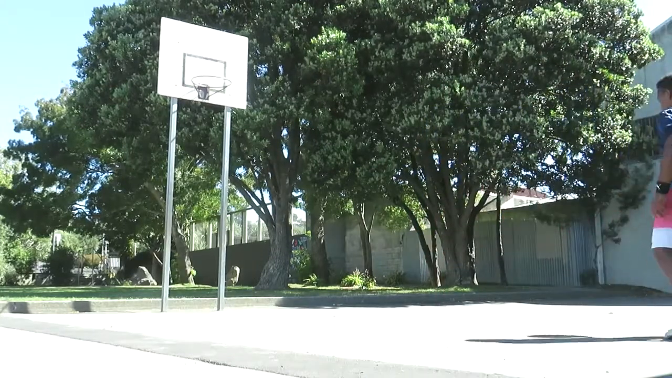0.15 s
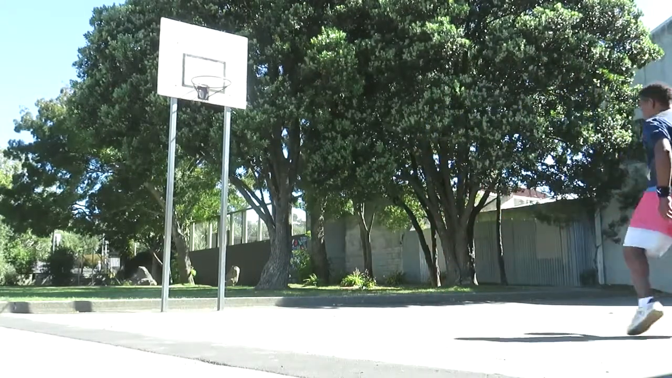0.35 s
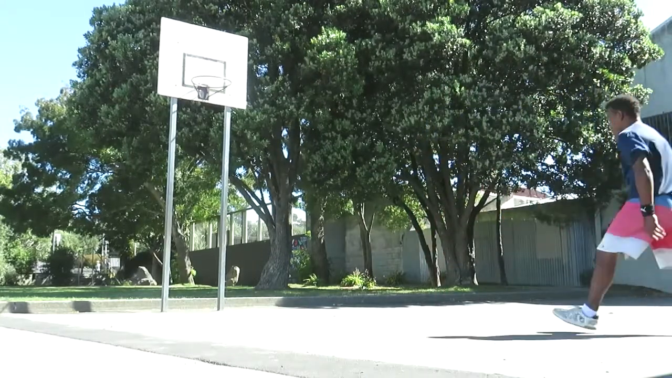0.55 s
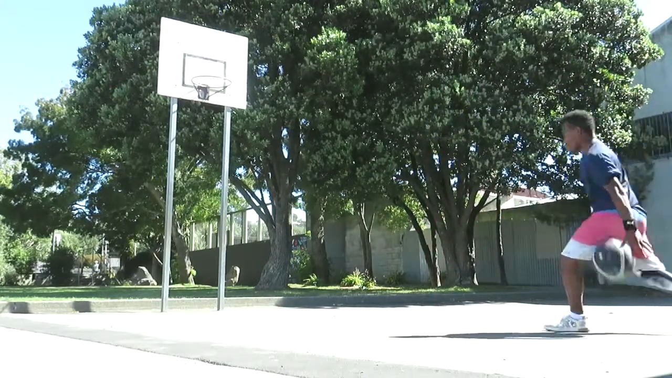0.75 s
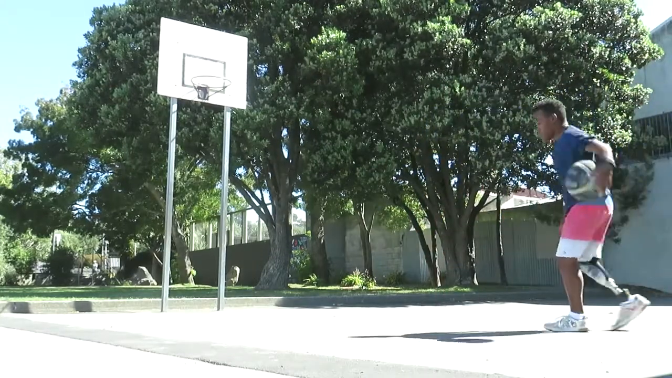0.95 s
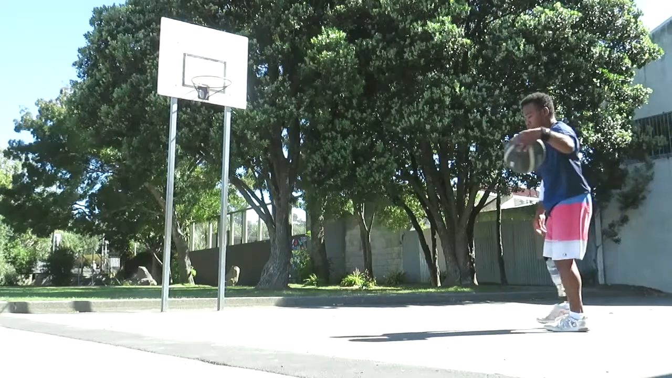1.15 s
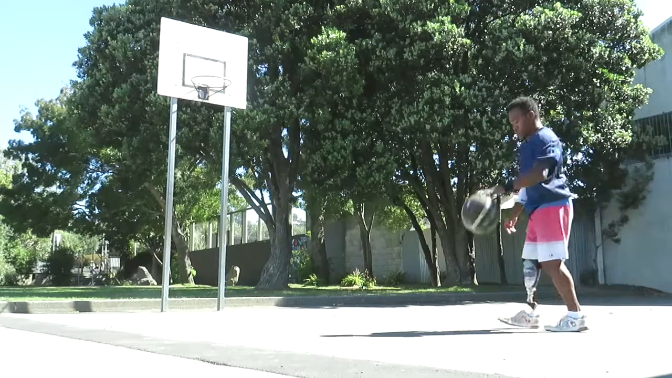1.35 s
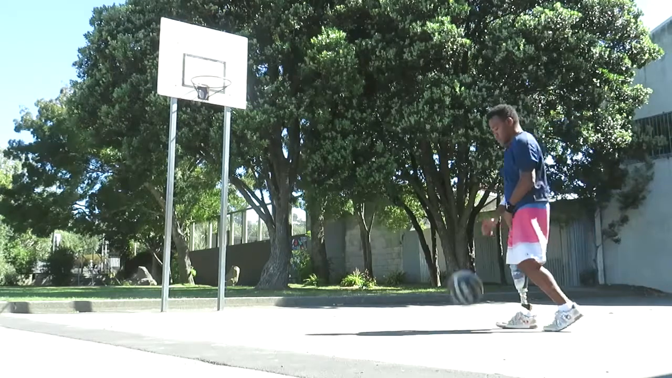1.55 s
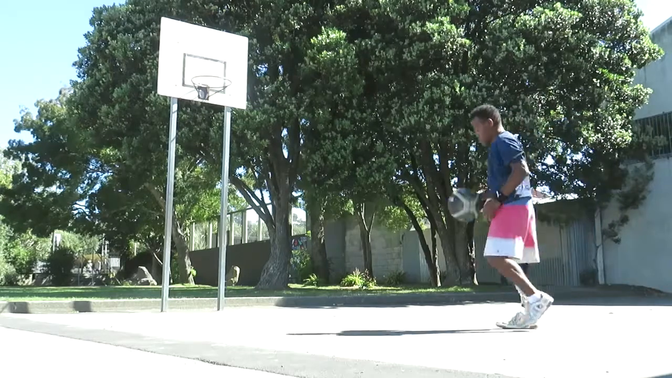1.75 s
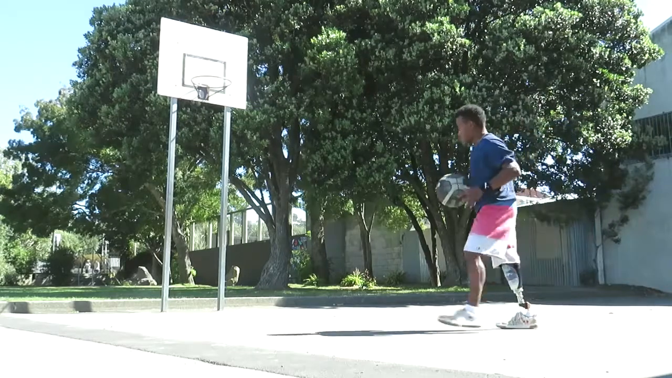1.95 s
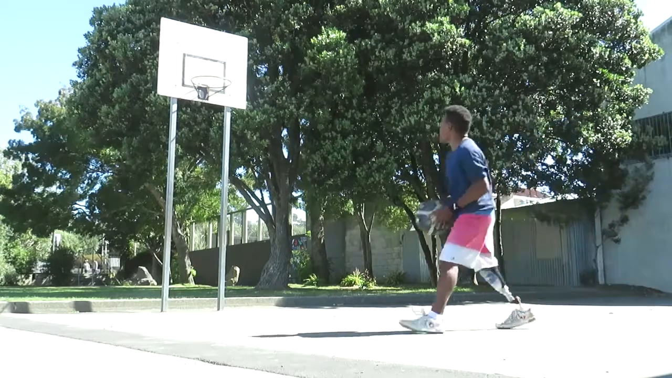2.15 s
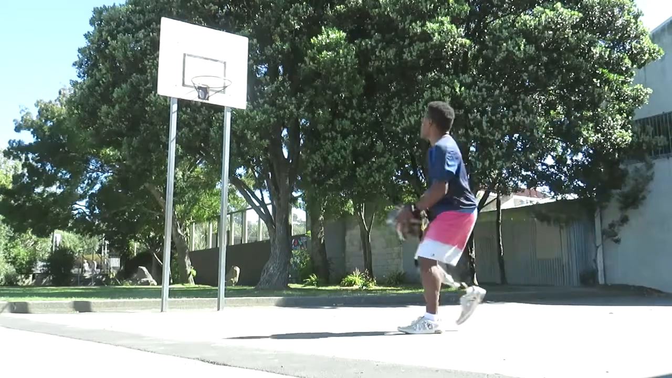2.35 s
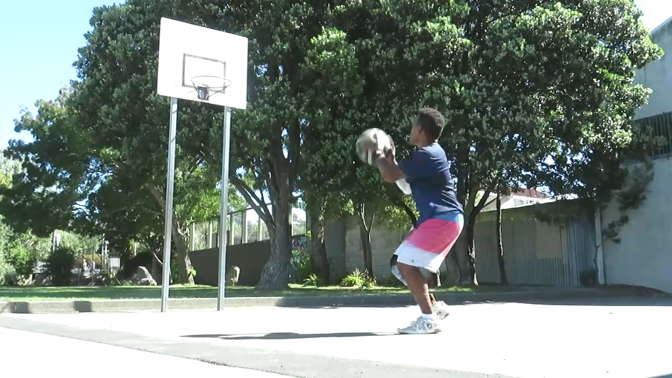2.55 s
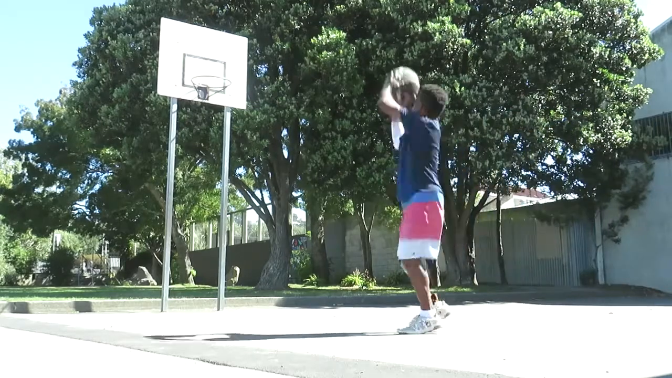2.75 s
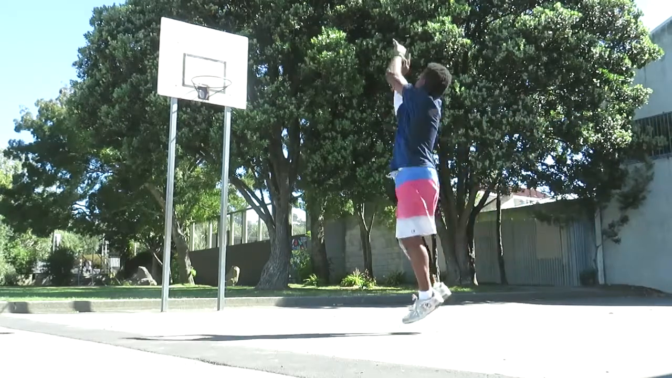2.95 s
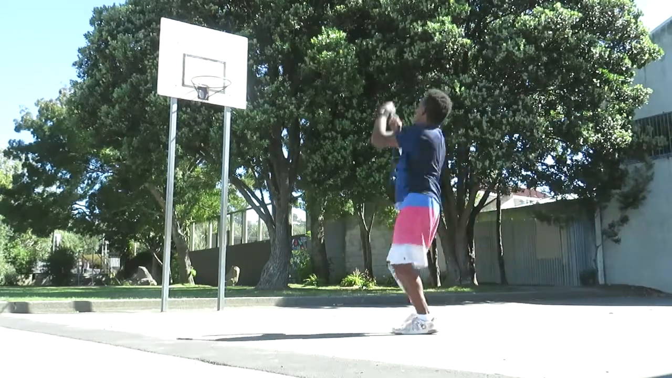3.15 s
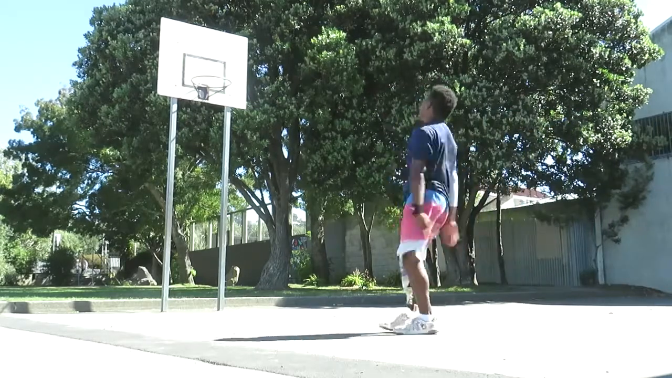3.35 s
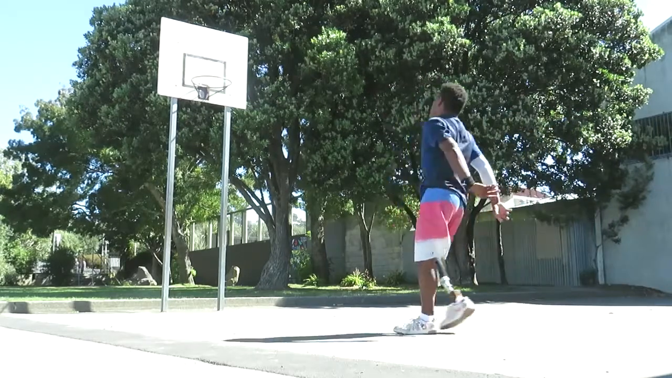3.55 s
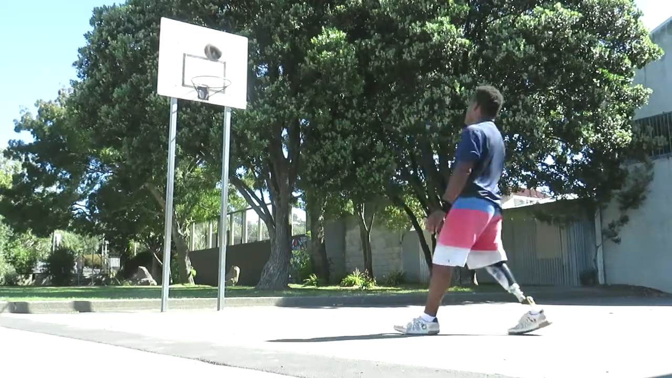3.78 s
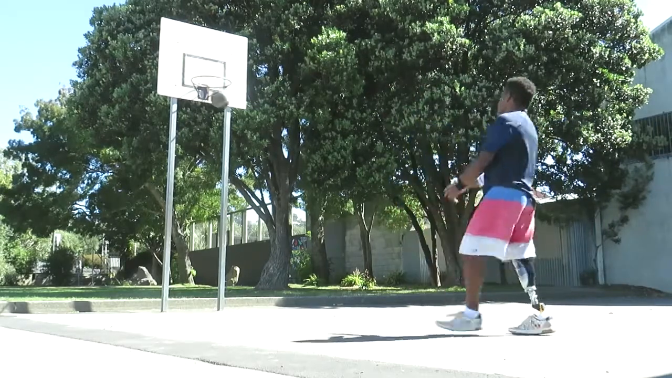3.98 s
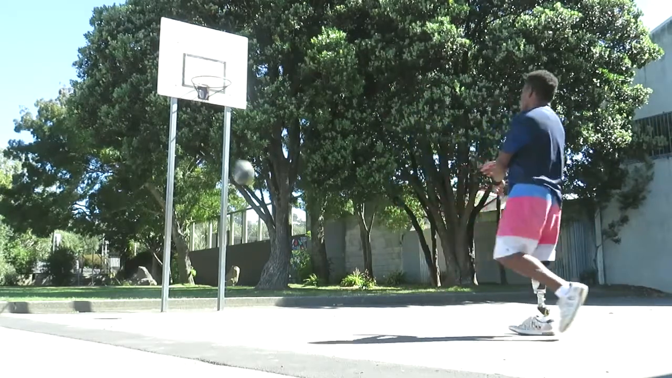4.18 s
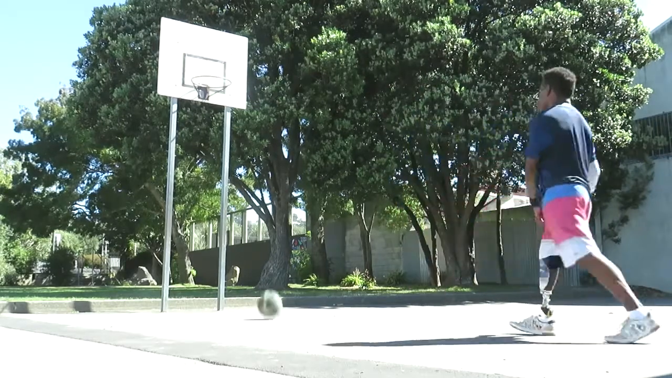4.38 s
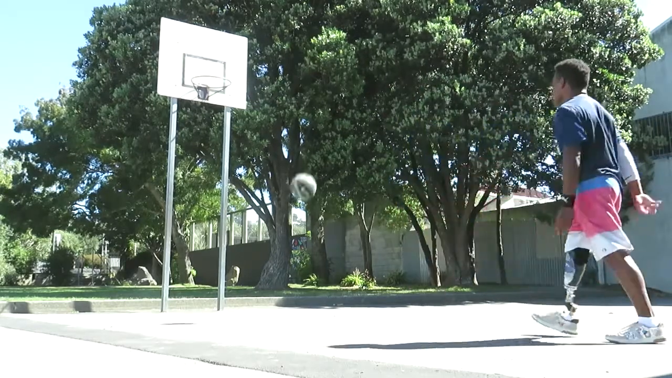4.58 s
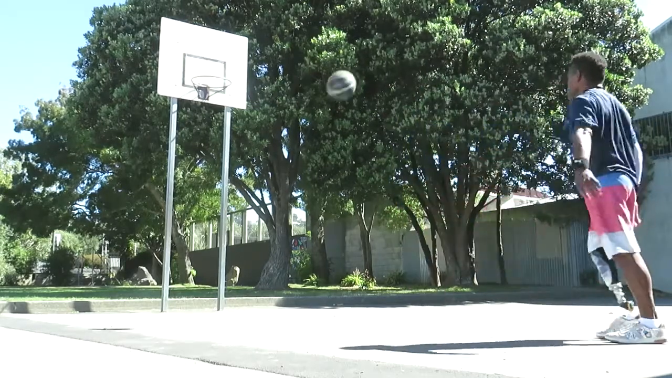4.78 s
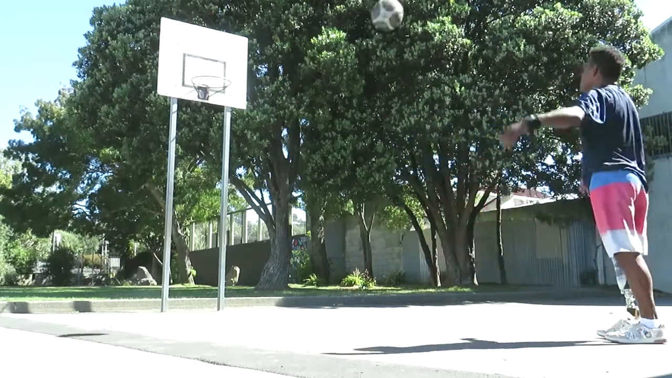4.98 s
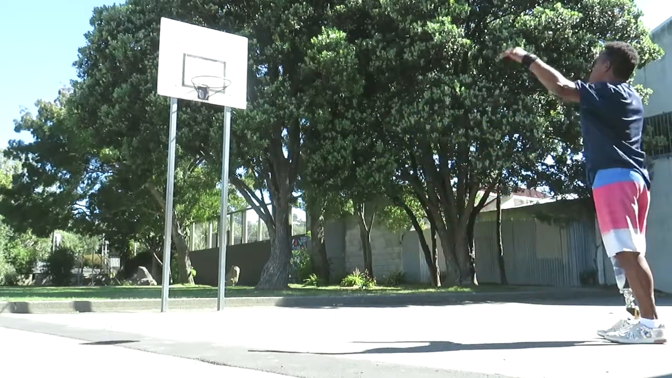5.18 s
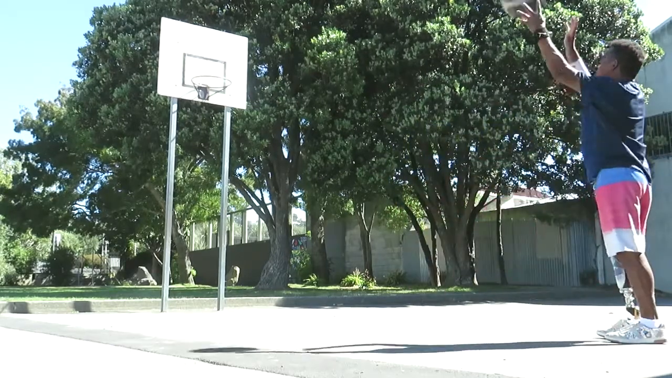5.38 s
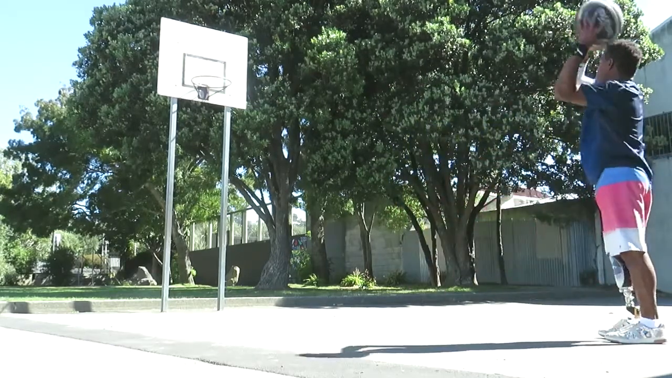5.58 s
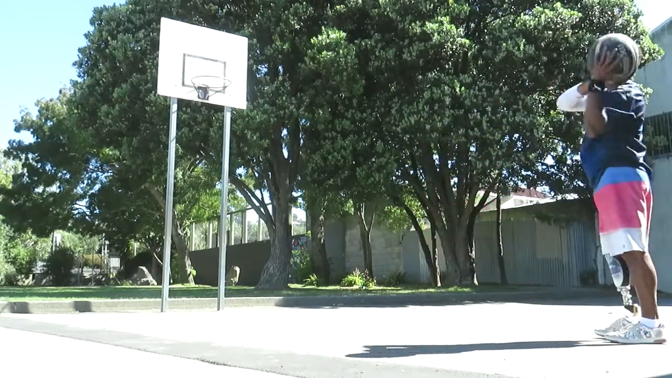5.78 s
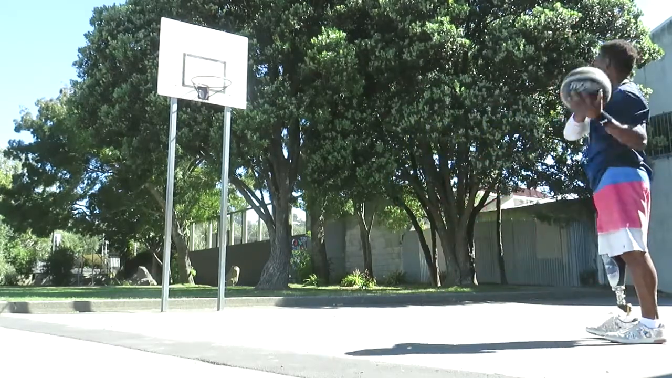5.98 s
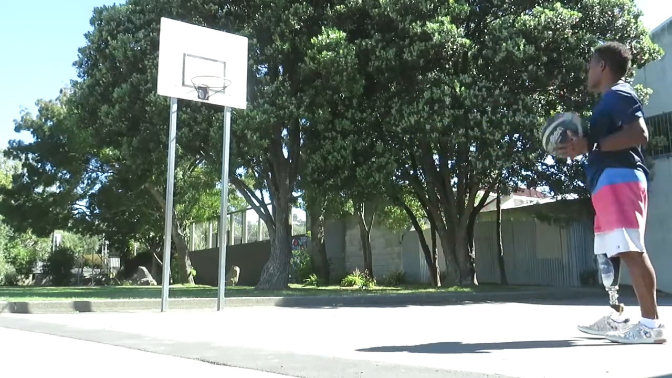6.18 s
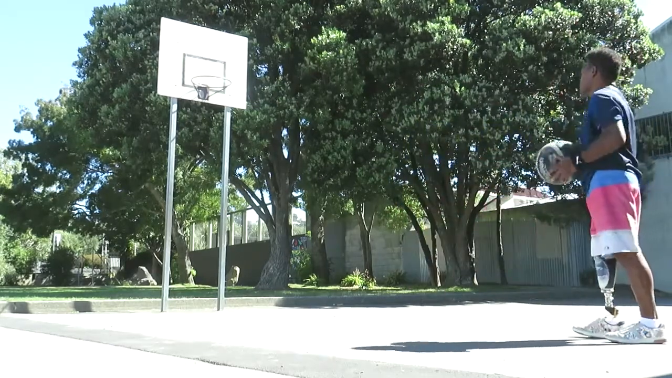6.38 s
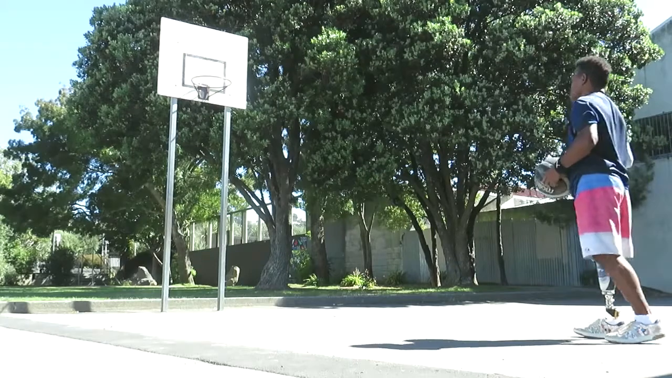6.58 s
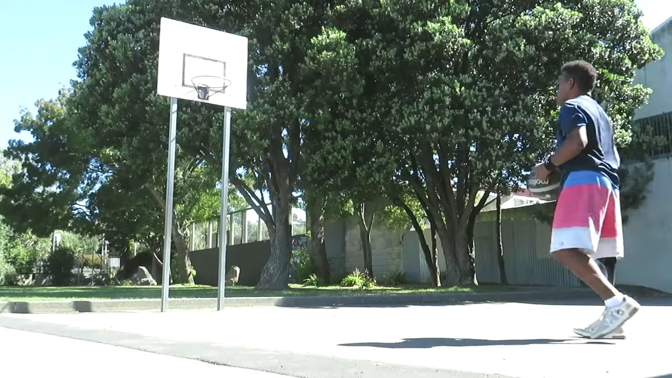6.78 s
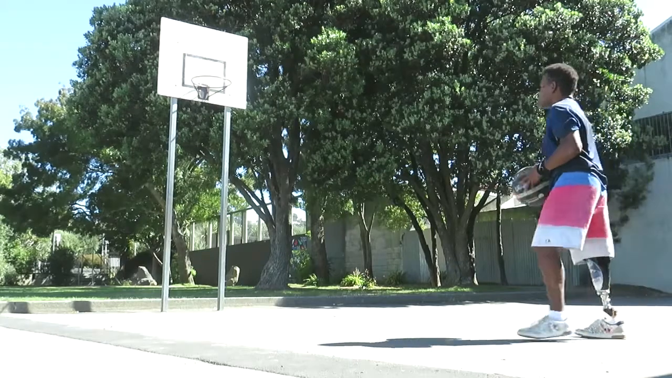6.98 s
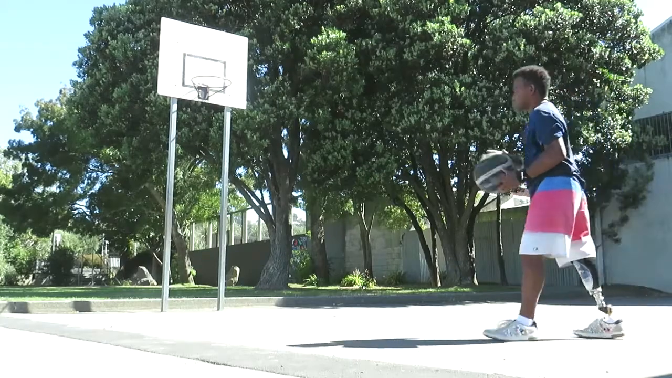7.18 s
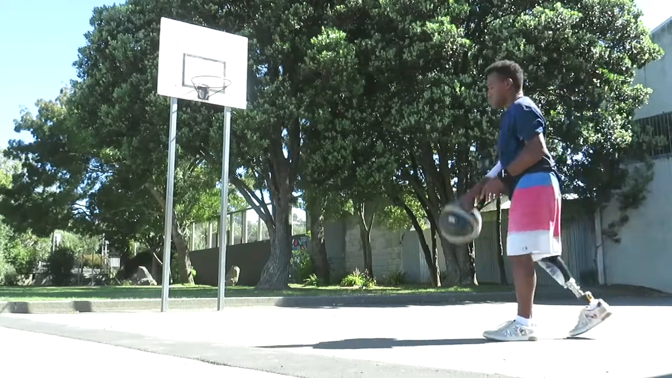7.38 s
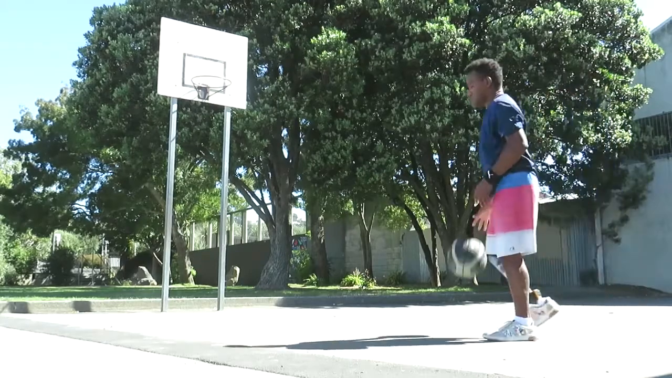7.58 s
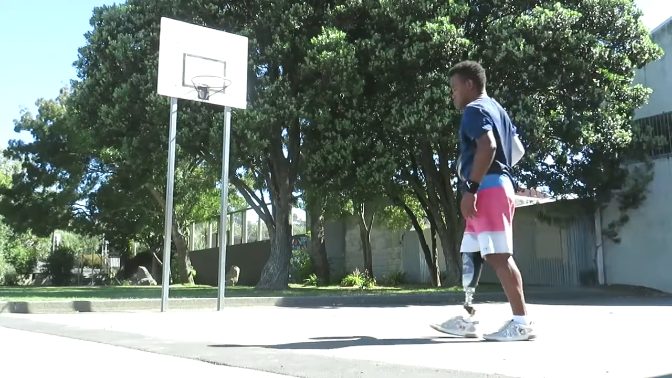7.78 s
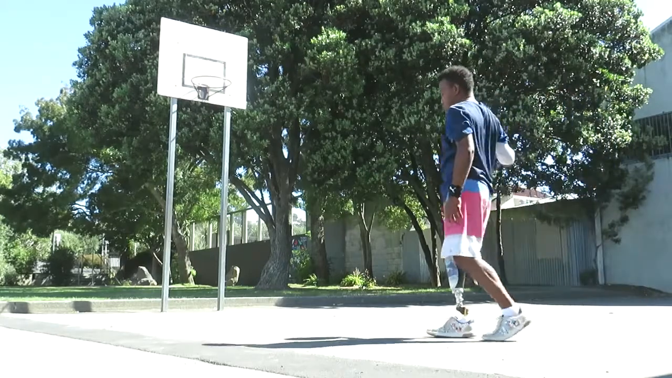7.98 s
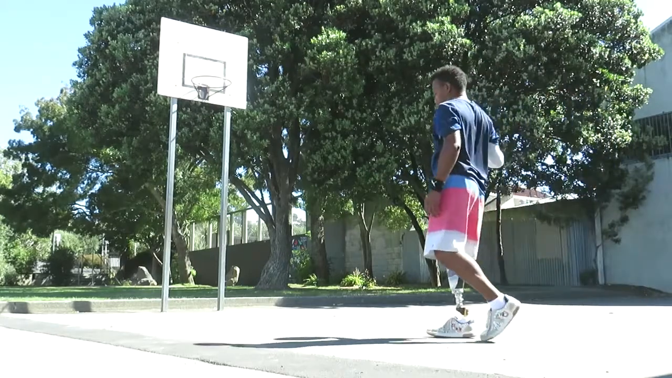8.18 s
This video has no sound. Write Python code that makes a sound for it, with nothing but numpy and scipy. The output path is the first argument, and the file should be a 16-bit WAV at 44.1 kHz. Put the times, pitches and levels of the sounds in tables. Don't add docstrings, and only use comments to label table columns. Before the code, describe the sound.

Sharp, ringing ball bounces with wall slapback, footsteps and one rattling backboard hit, over cicadas, a low road roar and gusty microphone rumble.

```python
import sys
import numpy as np
from scipy import signal
from scipy.fft import rfft, irfft, next_fast_len
from scipy.io import wavfile
from scipy.ndimage import uniform_filter1d

SR = 44100
rng = np.random.default_rng(int(sys.argv[2]) if len(sys.argv) > 2 else 0)


def magnitude_from_level(level_db):
    exponent = np.asarray(level_db, float) / 20
    return 10 ** exponent


def wav_out(sig):
    wavfile.write(sys.argv[1], SR, np.round(np.clip(np.atleast_2d(sig).T, -1, 1) * 32767).astype(np.int16))


N = 362943
TIME = np.arange(N) / SR

# [mode_hz, level_db, t60_s]
CAVITY = [(400, -4, .035), (780, -1.5, .018), (950, -2, .02), (1240, -1, .016), (1660, 0, .013),
          (2170, -2.5, .011), (2600, -1.5, .009), (3300, 2.5, .007), (4300, -8, .005), (5100, -12, .004)]
# [freq_hz, level_db_per_hz]
GRIT = [(180, -54), (300, -9), (379, -5), (607, -6), (692, -7.5), (1690, -17.5), (3970, -25), (10000, -50),
        (13000, -61), (22000, -120)]


def evened(x):
    return x / np.sqrt(np.mean(x ** 2) + 1e-20)


def read(points, hz):
    f, value = np.transpose(points)
    return np.interp(np.log(hz + 1), np.log(f + 1), value)


def add(mix, s, sound):
    part = mix[round(s * SR):][:len(sound)]
    part += sound[:len(part)]


def coloured(points, size=N):
    long = next_fast_len(size, True)
    hz = np.fft.rfftfreq(long, 1 / SR)
    spectrum = rfft(rng.standard_normal(long)) * magnitude_from_level(read(points, hz))
    return evened(irfft(spectrum, long)[:size])


def drift(hz):
    coarse = coloured([(0, 0), (32 * hz, -3), (128 * hz, -40), (SR / 2, -60)], size=N // 32 + 2)
    return np.interp(np.arange(N) / 32, np.arange(len(coarse)), coarse)


def swells(rows, rise, fall, rest_db):
    start, hold, db = np.transpose(rows)[:, :, None]
    away_db = rise * np.maximum(start - TIME, 0) + fall * np.maximum(TIME - start - hold, 0)
    return np.maximum((db - away_db).max(0), rest_db)


def resonate(x, hz, width):
    turn = np.exp(2j * np.pi * np.cumsum(hz * np.ones(len(x))) / SR)
    r = np.exp(-np.pi * width / SR)
    return 2 * (turn * signal.lfilter([1 - r], [1, -r], x / turn + 1e-18)).real


def ring(modes, t, spread_db):
    total = 0
    for hz, db, t60 in modes:
        strength, detune = rng.standard_normal(2)
        decay = magnitude_from_level(db + spread_db * strength - 60 * t / t60)
        total = total + decay * np.sin(2 * np.pi * hz * (1 + .015 * detune) * t)
    return total


def ports(total, difference):
    return np.array([total + difference, total - difference])


def traffic():
    # [freq_hz, level_db_per_hz]
    roar = [(12, -63), (20, -20), (75, 2), (156, -4), (168, -14), (188, -5), (327, -7.5), (376, -11.5),
            (412, -11.5), (532, -15.5), (718, -15), (1810, -28), (5000, -38.5), (6500, -50), (7000, -53),
            (11500, -56), (16000, -61)]
    # [time_s, level_db]
    passing = [(0, -50), (.3, -47.3), (1.2, -46.6), (2.3, -46.2), (3.2, -48), (4.3, -46.1), (5.2, -48.4),
               (6.5, -48.6), (7.4, -47.6), (8.23, -49.2)]
    # [freq_hz, difference_minus_sum_db]
    spread = [(60, -44), (300, -11.5), (1000, -10), (3000, 5), (8000, -12)]
    level = magnitude_from_level(np.interp(TIME, *np.transpose(passing)) + 8.5 + 0.95 * drift(3.9))
    side = [(hz, db + read(spread, hz)) for hz, db in roar]
    return level * ports(coloured(roar), magnitude_from_level(-21) * coloured(side))


def cicadas(db, drums, clicks_per_s, lag, alike):
    long = next_fast_len(N, True)
    freq = np.fft.rfftfreq(long, 1 / SR)
    clicks = rng.standard_normal((2, N)) * (rng.random((2, N)) < clicks_per_s / SR)
    one, other = rfft(clicks, long) * magnitude_from_level(read(drums, freq))
    late = alike * one * np.exp(-2j * np.pi * freq * lag) + np.sqrt(1 - alike ** 2) * other
    return magnitude_from_level(db) * evened(irfft(np.array([one, late]), long)[:, :N])


def low_chorus():
    # [time_s, level_db]
    swelling = [(0, -77), (.15, -65), (.66, -57), (.82, -64), (1.4, -63.5), (2.1, -58.5), (2.85, -58),
                (3.1, -62), (3.6, -61), (3.85, -57), (4.01, -61), (4.7, -64.5), (5.06, -60), (6.19, -55.5),
                (6.45, -60), (6.9, -57), (7.6, -61.5), (8.2, -57)]
    # [freq_hz, level_db_per_hz]
    drums = [(3000, -40), (4900, -16), (5600, -1), (6800, 0), (8200, -4), (9500, -15), (12000, -25),
             (16000, -40)]
    level_db = np.interp(TIME, *np.transpose(swelling)) + 5 + .6 * drift(23)
    return cicadas(level_db, drums, 14000, .000045, 0.53)


def high_buzz():
    # [time_s, level_db]
    loudness = [(0, -73), (2.5, -71), (4, -69), (4.6, -71), (5.5, -75), (8.23, -76)]
    # [freq_hz, level_db_per_hz]
    drums = [(10000, -30), (12200, -8), (13000, 0), (15000, -1), (15700, -8), (16200, -40)]
    throbs_per_s, throb_start = 9.77, -.03
    turns = np.cumsum(throbs_per_s * (1 + .015 * drift(3))) / SR - throb_start
    swing_db = (6.5 + 1.0 * drift(.8)) * np.cos(2 * np.pi * turns)
    level_db = np.interp(TIME, *np.transpose(loudness)) + 3 + swing_db
    return cicadas(level_db, drums, 9000, .000037, .72)


def near_rasp():
    # [start_s, hold_s, level_db]
    start_up = (3.81, .05, -51.5)
    # [freq_hz, level_db_per_hz]
    drums = [(4000, -30), (4600, -2), (5300, 0), (6500, -8), (8000, -25)]
    return cicadas(swells([start_up], 900, 630, -120), drums, 6000, .00002, .8)


def birds():
    # [start_s, length_s, pitch_hz, level_db]
    calls = [
        (4.55, 0.19, 2820, -55),
        (4.86, 0.16, 2830, -59),
        (7.932, 0.18, 5680, -62),
    ]
    song = np.zeros(N)
    for s, length, hz, db in calls:
        t = np.arange(round(length * SR)) / SR
        swell = np.sin(np.pi * (t / length) ** .8)
        add(song, s, magnitude_from_level(db) * np.sqrt(2) * np.sin(2 * np.pi * hz * t) * swell)
    return song


def trees():
    return low_chorus() + high_buzz() + near_rasp() + birds()


def wind():
    # [start_s, hold_s, port_difference_db]
    gusts = [(0, .45, -61), (.5, .17, -58), (.82, .38, -57), (1.3, .5, -61), (1.94, .05, -38),
             (2.06, .2, -31), (2.3, .15, -34), (2.5, .2, -28), (2.76, .1, -41), (3.6, .17, -47),
             (3.91, .05, -52), (4.19, .25, -30), (4.52, .1, -48), (4.66, .22, -47), (5.14, .02, -50),
             (5.94, .07, -49), (6.2, .12, -48), (6.41, .06, -49), (6.63, .07, -51), (6.75, .75, -60),
             (7.85, .4, -58)]
    # [time_s, peak_db, pitch_hz]
    puffs = [(1.932, -21, 62.3), (2.163, -13, 132), (2.489, -15, 94), (2.66, -17, 72), (2.699, -19, 160),
             (4.165, -18, 96.9), (4.345, -15, 146), (4.522, -21, 120), (4.693, -21, 137), (4.718, -18, 105),
             (5.083, -29, 167), (5.136, -24, 150), (5.153, -15, 126), (5.959, -26, 78.1), (6.293, -25, 102)]
    # [freq_hz, level_db_per_hz]
    sum_colour = [(8.8, -54), (15, -18), (44, -3), (76, 1), (142, -3), (242, -10.5), (468, -34.5),
                  (700, -50), (910, -74), (1540, -120)]
    difference_colour = [(8.8, -58), (15, -38), (86, -0.5), (157, -6), (249, -6), (402, -16.5), (511, -33),
                         (900, -49), (1170, -71), (1980, -120)]
    db = swells(gusts, 300, 300, -84)
    lumps_db = 3.5 * drift(20)
    eddies = coloured(difference_colour) * magnitude_from_level(lumps_db + 2.4 * drift(36))
    difference = magnitude_from_level(db) * evened(eddies)
    total = magnitude_from_level(-26 + .56 * (db + 33)) * evened(coloured(sum_colour) * magnitude_from_level(.75 * lumps_db))
    t = np.arange(2000) / SR
    for s, peak_db, hz in puffs:
        puff = magnitude_from_level(peak_db) * np.sin(2 * np.pi * hz * t) * (t * hz / 0.37) * np.exp(1 - t * hz / .4)
        add(total, s, puff)
        add(difference, s, .4 * np.gradient(puff) * SR / (2 * np.pi * hz))
    return ports(total, difference)


def knock(db, hz, length, grit_db):
    t = np.arange(3000) / SR
    shape = (1 - np.exp(-t / .0004)) * np.exp(-t / length)
    burst = rng.standard_normal(len(t)) * shape
    hollow = resonate(resonate(burst, hz, .8 * hz), hz, .8 * hz)
    grit = coloured(GRIT, size=len(t)) * shape ** 2
    return magnitude_from_level(db) * (hollow / abs(hollow).max() + magnitude_from_level(grit_db) * grit)


def scuffs():
    # [start_s, hold_s, level_db]
    drags = [(.135, .02, -50), (.175, .01, -44), (.21, .03, -43), (.975, .04, -44), (1.286, .075, -55),
             (2.505, .01, -47), (5.548, .03, -52)]
    grains = signal.lfilter([1, -.6], 1, coloured(GRIT)) * magnitude_from_level(3.5 * drift(170))
    return evened(grains) * magnitude_from_level(swells(drags, 600, 500, -120) + 3)


def footsteps(near, wall):
    # [time_s, peak_db, hollow_hz, length_s, grit_re_hollow_db]
    steps = [(.976, -27, 1250, .012, -14), (1.05, -34, 1350, .006, -14), (2.086, -15, 400, .007, -15),
             (2.498, -22, 980, .009, -12), (3.097, -32, 1100, .003, -3), (3.159, -18, 450, .007, -11),
             (3.169, -21, 420, .004, -25), (3.387, -26, 750, .01, -14), (3.397, -36, 2500, .002, -2),
             (4.803, -34, 700, .018, -2), (7.146, -29, 2800, .006, -6), (7.952, -43, 2200, .008, -2)]
    for s, *sole in steps:
        sound = knock(*sole)
        add(near, s, sound)
        add(wall, s + 0.085, sound)


def palms(near, wall):
    # [time_s, peak_db, hollow_hz]
    touches = [
        (5.471, -11, 190),
        (5.477, -18, 260),
        (5.495, -16, 320),
    ]
    t = np.arange(3000) / SR
    for s, db, hz in touches:
        cavity = ring([(770, -6, .03), (950, 1, .045), (1150, -1.5, .025)], t, 1)
        cavity = cavity * (1 - np.exp(-t / .0008))
        sound = knock(db, hz, .008, -14) + magnitude_from_level(db - 1.5) * cavity
        add(near, s, sound)
        add(wall, s + .072, sound)


def slap(t, width):
    push = np.exp(-((t - .0003 - 2.4 * width) / (1.3 * width)) ** 2)
    return push - .85 * np.exp(-((t - .0003) / width) ** 2)


def backboard(near):
    # [time_s, slap_peak_db, then board_db, cavity_db, rattle_db re slap]
    hit = (3.898, -9, 8.5, -10, -17)
    # [mode_hz, level_db, t60_s]
    panel = [(102, 0, .3), (149, -5, .25), (175, 3, .26), (220, -6, .22), (296, -9, .32), (365, -11, .3),
             (437, -13, .3), (555, -18, .13), (800, -22, .08), (1100, -17, .12), (1900, -29, .06)]
    # [time_s, peak_db, hollow_hz, length_s, grit_re_hollow_db]
    jolts = [
        (3.953, -18, 2100, .004, -6),
        (3.956, -15, 1050, .007, -9),
        (3.972, -23, 850, .008, -8),
        (4.042, -24, 1100, .003, -1),
    ]
    s, db, board_db, cavity_db, rattle_db = hit
    t = np.arange(14000) / SR
    blow = slap(t, .0001) + magnitude_from_level(cavity_db) * ring(CAVITY, t, 2)
    boom = ring(panel, t, 1) * (1 - np.exp(-t / .003))
    rattle = coloured(GRIT, size=14000) * magnitude_from_level(-60 * t / .2) * (1 - np.exp(-t / .001))
    add(near, s, magnitude_from_level(db) * (blow + magnitude_from_level(board_db - 6) * boom + magnitude_from_level(rattle_db) * rattle))
    for s, *jolt in jolts:
        add(near, s, knock(*jolt))


def shell_thump(late, rise_ms):
    sink_turns = .6 - .052 * rise_ms
    turns = 108 * late + sink_turns * (1 - np.exp(-late / .0018))
    thump = np.sin(2 * np.pi * turns) * (1 - np.exp(-1000 * late / rise_ms)) ** 2
    thump = thump * magnitude_from_level(-60 * (late / .04) ** 2)
    second = np.sin(2 * np.pi * 280 * late) * (1 - np.exp(-late / .004)) * magnitude_from_level(-60 * late / .08)
    return thump + .3 * second


def ball_cavity(late, ring_hz):
    modes = []
    for hz, db, t60 in CAVITY:
        octaves = min(abs(np.log2(hz / ring_hz)), abs(np.log2(hz / ring_hz / 2)))
        modes.append((hz, db + 5 * np.exp(-(octaves / .085) ** 2), t60))
    grit = coloured(GRIT, size=len(late)) * np.exp(-late / .003) * (late > 0)
    return ring(modes, late, 1) + 1.2 * grit


def bounce(db, ring_hz, rise_ms):
    t = np.arange(5000) / SR
    late = np.maximum(t - .0005, 0)
    slap_width = .000088 * (780 / ring_hz) ** .55
    thump = magnitude_from_level(-4.4 + 1.1 * rise_ms) * shell_thump(late, rise_ms)
    return magnitude_from_level(db) * (slap(t, slap_width) + thump + magnitude_from_level(-12) * ball_cavity(late, ring_hz))


def dribble(near, wall):
    # [time_s, wall_delay_s, slap_peak_db, ring_hz, thump_rise_ms]
    bounces = [
        (.7120, .066, -1.5, 950, 1),
        (1.5569, .071, -1.5, 1240, 4),
        (4.4499, .067, .5, 760, .8),
        (7.5547, .072, 0, 1640, 4),
    ]
    for s, delay, *blow in bounces:
        sound = bounce(*blow)
        add(near, s, sound)
        add(wall, s + delay, sound)


def player():
    near, wall = np.zeros(N), np.zeros(N)
    footsteps(near, wall)
    palms(near, wall)
    backboard(near)
    dribble(near, wall)
    near = near + scuffs()
    air = signal.butter(4, 9500, fs=SR)
    return signal.lfilter(*air, near), signal.lfilter(*air, wall)


def wall_echo(wall):
    t = np.arange(1500) / SR
    facets = rng.standard_normal((2, 1500)) * np.exp(-t / .005) * (rng.random(1500) < .15)
    facets = facets + 3.2 * facets[::-1].sum(0)
    thin = signal.lfilter(*signal.butter(2, [250, 2400], "band", fs=SR), wall)
    return signal.oaconvolve(thin[None], facets / np.linalg.norm(facets[0]), axes=1)[:, :N]


def scattered_tail(near):
    # [freq_hz, t60_s]
    decay = [(100, .35), (400, .5), (1500, .62), (3200, .62), (5000, .48), (9000, .2)]
    posts = [440, 1290, 2150]
    thin = signal.lfilter(*signal.butter(1, [350, 6000], "band", fs=SR), near)
    scatter, size = np.zeros((2, N)), SR // 2
    for place in range(3):
        taps = np.zeros((2, size))
        at = np.arange(400, size - 20, 20) + rng.integers(0, 20, (2, (size - 401) // 20))
        np.put_along_axis(taps, at, rng.choice([-1., 1.], at.shape), 1)
        taps[:, posts] += [3.0, 2.0, 1.2]
        hz, t, z = signal.stft(taps + 1.9 * taps.sum(0), SR, nperseg=256)
        fading = z * magnitude_from_level(-60 * t / read(decay, hz)[:, None])
        tail = signal.istft(fading, SR, nperseg=256)[1]
        share = np.sqrt(2 / 3) * np.cos(np.pi * (.41 * TIME + place / 3))
        scatter += signal.oaconvolve((thin * share)[None], tail / np.linalg.norm(tail[0]), axes=1)[:, :N]
    return scatter


def court(near, wall):
    # [time_s, left_port_late_s]
    sideways = [(0, .00003), (1.5, .00002), (3, .00001), (3.9, -.00002), (4.4, .00001), (5.5, .00003),
                (8.2, .00002)]
    late = np.interp(TIME, *np.transpose(sideways))
    direct = ports(near, -late / 2 * np.gradient(near) * SR - .012 * near)
    return direct + magnitude_from_level(-13.5) * wall_echo(wall) + magnitude_from_level(-14.5) * scattered_tail(near)


def scene():
    return traffic() + trees() + wind() + court(*player())


def roll_off(x):
    return signal.sosfilt(signal.butter(12, 15760, fs=SR, output="sos"), x)


def record(dry):
    power = uniform_filter1d((dry ** 2).mean(0), 400, origin=199)
    power_db = 10 * np.log10(abs(power) + 1e-12)
    fall = TIME * 38.
    held_db = np.maximum.accumulate(power_db + fall) - fall
    over_db = np.maximum(held_db + 16, 0)
    ducked = dry / magnitude_from_level(.45 * uniform_filter1d(over_db, 600, origin=299))
    return roll_off(np.clip(ducked, -1, 1))


dry = scene()
out = record(dry)
wav_out(out)
```